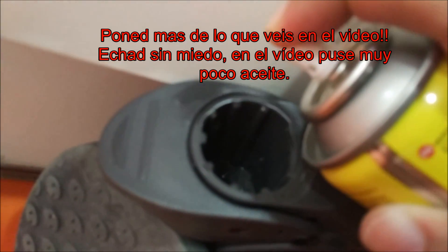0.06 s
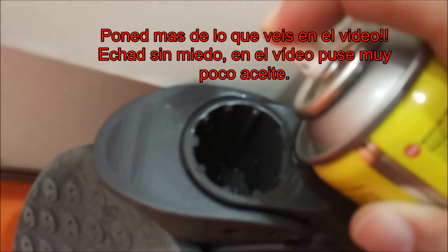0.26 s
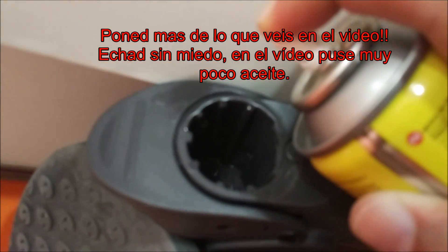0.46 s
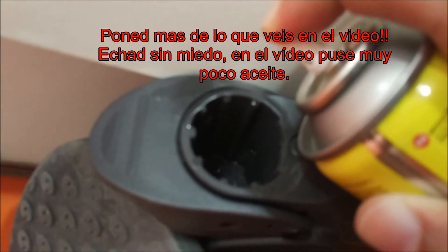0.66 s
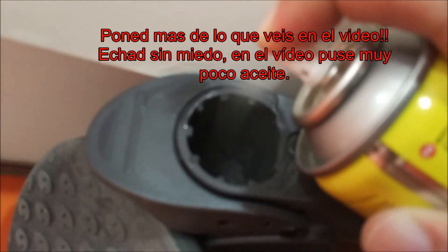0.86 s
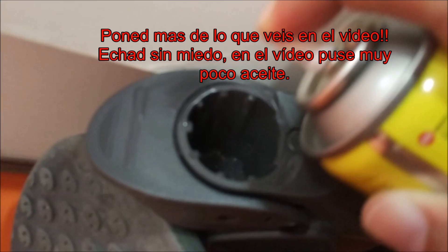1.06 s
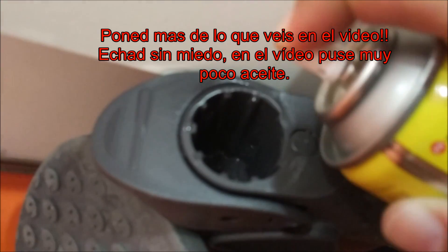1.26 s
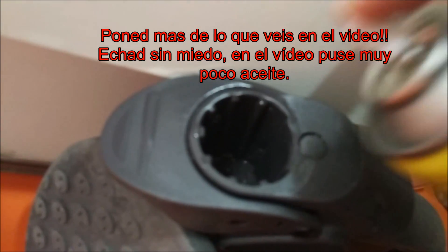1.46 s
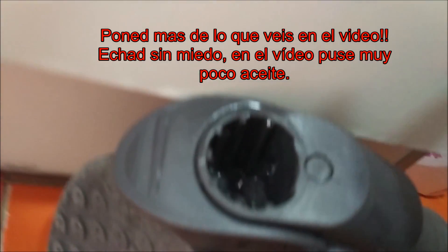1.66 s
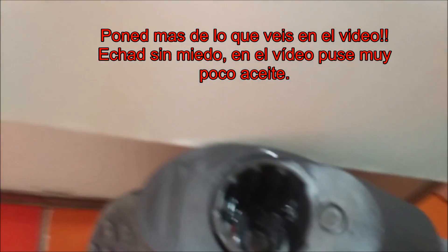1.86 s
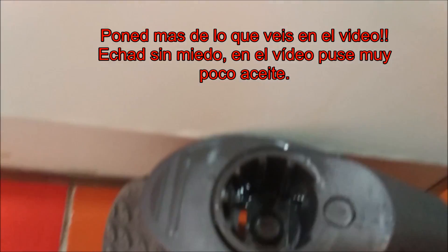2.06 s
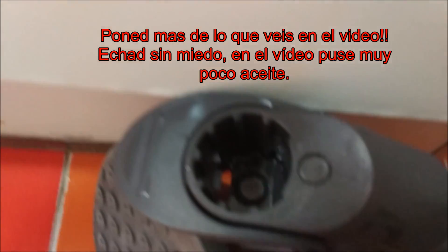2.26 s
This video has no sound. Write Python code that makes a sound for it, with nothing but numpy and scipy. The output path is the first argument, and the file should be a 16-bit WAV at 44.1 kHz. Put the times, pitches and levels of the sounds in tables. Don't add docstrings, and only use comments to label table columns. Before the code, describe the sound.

An aerosol can sprays close up: a short puff, a brief gap, then a long hiss that swells and weakens before stopping. Small can clicks and hard knocks on tile follow, in a small room, phone microphone.

```python
import sys
import numpy as np
from scipy import signal
from scipy.fft import rfft, irfft, next_fast_len
from scipy.io import wavfile
from scipy.ndimage import uniform_filter1d

SR = 44100
rng = np.random.default_rng(int(sys.argv[2]) if len(sys.argv) > 2 else 0)


def master(y):
    cut = np.clip(np.atleast_2d(y).T, -1, 1)
    pcm = np.round(cut * 32767)
    wavfile.write(sys.argv[1], SR, pcm.astype(np.int16))


def field_ratio(decibels):
    return 10 ** (np.asarray(decibels, dtype=float) / 20)


N = 101429
SIDES = np.array([[1], [-1]])

# frequency in Hz, level in dB per Hz.
HOME_COLOUR = [(59, -71), (100, -57), (277, -3.5), (358, -31.5), (535, -8.5), (634, -15.5), (1130, -10),
               (1550, -15.5), (16000, -29.5)]
# frequency in Hz, width in Hz, level in dB.
HOME_DRONES = [(201, 46, 3), (312, 69, -5), (530, 135, -9.5)]
# start in seconds, level in dB, left minus right in dB, tilt in dB per octave.
KNOCKS = [
    (0.015, -82, 12, 9),
    (1.887, -60.5, 0, 9.5),
    (1.958, -42, -4, 4),
    (1.9626, -66.5, -26, 4),
    (1.9705, -53.5, -5, 9),
    (2.1404, -58, -8, 9.5),
    (2.144, -60, -5, 4),
    (2.151, -56.5, -10, 6),
    (2.1969, -47, -4, 1),
]
# frequency in Hz, level in dB, T60 in seconds.
HOUSING_MODES = [(546, 8.5, 0.058), (830, -16, 0.028), (944, 18, 0.024), (1218, 9.5, 0.04),
                 (1355, 10.5, 0.027), (1450, 6.5, 0.04), (1640, 0, 0.051), (2350, 4, 0.017),
                 (2730, -5, 0.082), (3360, -20, 0.014)]
# start in seconds, level in dB, scrape length in seconds,
# left minus right in dB, tilt in dB per octave.
TICKS = [
    (0.064, -91, 0.0022, 2, -6),
    (0.14, -79, 0.0028, -12, 32),
    (1.5488, -50, 0.004, 8, 4),
    (1.5542, -48, 0.005, 8, -6),
    (1.598, -65, 0.015, 14, 5),
    (1.887, -72, 0.0014, -2, -29),
    (2.0037, -57.5, 0.0099, 13.5, 11.5),
    (2.283, -67.5, 0.016, 17, 10.5),
    (1.678, -76, 0.043, 25, 21),
    (2.073, -73, 0.0049, 6, 10),
]
# frequency in Hz, level in dB, T60 in seconds.
CAN_MODES = [(3300, -14, .008), (4110, -11, .012), (4990, -8, .018), (6008, 0, .014), (7150, -1, .018),
             (8490, -8, .012), (9930, -13, .01), (13120, -20, .008)]
# time in seconds, gas flow in dB, share blown into the hollow in dB.
VALVE_PRESSES = [
    [(.165, -83, -32), (.187, -60, -17), (.19, -50, -11), (.204, -49.5, -22), (.21, -41, -3),
     (.24, -40, 2.5), (.3, -38, 3), (.345, -42.5, -20), (.38, -62, -2)],
    [(.499, -46.5, -30), (.53, -46, 2), (.55, -40, 1), (.69, -34.5, -10), (.86, -34, -2.5), (.99, -29.5, 2),
     (1.04, -31.5, 0), (1.18, -33, -3), (1.24, -38, -12)],
    [(1.24, -39.5, -16.5), (1.33, -39.5, -4.5), (1.38, -45, -15.5), (1.388, -52, -18), (1.41, -90, 6)],
    [(.38, -82, -12), (.42, -65.5, 3), (.499, -64, 16)],
]
# frequency in Hz, level in dB per Hz.
JET_LEFT = [(150, -25), (600, -15.5), (1500, -8.5), (3000, -10), (5300, 1), (8400, 1), (11500, -5.5),
            (15500, 1.5)]
# frequency in Hz, level in dB per Hz.
JET_RIGHT = [(150, -32), (600, -12), (2100, -2), (3400, -2.5), (6000, -10), (9500, -5), (12300, 3),
             (15600, 4)]
# frequency in Hz, width in Hz, depth in dB.
SHADOWS_LEFT = [(3600, 450, -9), (4600, 250, -6), (9100, 350, -6), (11400, 600, -8), (12600, 350, -6)]
# frequency in Hz, width in Hz, depth in dB.
SHADOWS_RIGHT = [(3400, 400, -5), (6200, 350, -7), (8000, 400, -5), (11100, 350, -7), (13900, 600, -5)]
# frequency in Hz, width in Hz, level in dB, left minus right in dB.
HOLLOW_MODES = [(1626, 270, -16.5, -21), (1870, 360, -11.5, -17), (1105, 610, -13, -6),
                (6590, 280, -19, 15.5), (15800, 150, -15, -30)]
# frequency in Hz,
# width in Hz, start and end in seconds, cancelled share.
OPPOSED_BANDS = [(4270, 400, .218, .36, 1), (4250, 120, .36, .49, 1), (4260, 420, .49, .78, 1),
                 (4010, 230, .82, .945, 1), (3330, 90, .55, .69, 1), (3750, 130, 1.005, 1.045, 1),
                 (3560, 200, 1.03, 1.085, 1), (3560, 80, 1.14, 1.22, 1), (4020, 160, 1.165, 1.2, 1),
                 (3930, 120, 1.23, 1.3, 1), (3530, 70, 1.28, 1.36, 1), (10650, 300, 1.045, 1.085, 1),
                 (10750, 220, 1.095, 1.2, 1), (9100, 110, 1.06, 1.2, 1), (3750, 150, 1.42, 1.547, 1),
                 (4500, 130, 1.7, 1.87, 1), (7550, 110, 1.85, 1.94, 1), (8000, 110, 2.16, 2.26, 1)]
# frequency in Hz, width in Hz, start and end in seconds, removed # share.
LEFT_GAP_BANDS = [(11500, 150, .56, .62, 1), (11400, 330, .61, .67, 1), (11450, 350, .74, .81, 1),
                  (11450, 300, .87, .93, 1), (11250, 300, .92, .98, 1), (11600, 200, 1., 1.09, 1),
                  (12450, 120, .72, .95, 1), (13050, 130, .88, 1.05, 1), (9000, 110, .95, 1.06, 1),
                  (3600, 130, .52, .93, 1), (3400, 120, .98, 1.12, 1), (3400, 120, 1.3, 1.4, 1),
                  (12500, 220, 1.23, 1.3, 1), (11600, 200, 1.21, 1.28, 1), (11600, 150, 1.31, 1.38, 1),
                  (6150, 100, .5, .65, 1), (14500, 150, .54, .62, 1), (11400, 330, .24, .3, 1),
                  (12500, 170, .24, .33, 1), (3450, 120, .23, .45, 1)]
# centre in seconds, level in dB, length in seconds, frequency in Hz, width in Hz.
HOOTS = [
    (0.774, -50, 0.075, 1094, 304),
    (0.925, -38, 0.024, 1585, 83),
    (0.999, -34.5, 0.028, 1581, 90),
    (1.089, -38, 0.026, 1556, 101),
    (1.165, -40, 0.026, 1578, 90),
]
# start in seconds, level in dB, centre in Hz, fade in seconds,
# left minus right in dB.
SCUFFS = [
    (1.5538, -52, 2600, .003, 4),
    (1.958, -54, 4000, .0012, 0),
    (1.958, -59, 10000, .001, 0),
    (1.9635, -60, 4000, .001, 0),
    (1.975, -62, 1900, .03, -4),
    (2.1396, -54, 4800, .003, -2),
    (2.143, -62, 3500, .03, 0),
    (2.153, -58, 4500, .003, 4),
    (1.562, -66, 7000, .04, 8),
]


def table(rows, hz):
    rows = np.array(rows)
    return np.interp(np.log(hz + 1), np.log(rows[:, 0]), rows[:, 1])


def shape(x, gain):
    size = next_fast_len(N + 4096)
    return irfft(rfft(x, size) * gain(np.fft.rfftfreq(size, 1 / SR)), size)[..., :N]


def unit(x):
    return x / np.sqrt(np.mean(x ** 2))


def peak(hz, centre_hz, width_hz):
    return 1 / (1 + 1j * (hz ** 2 - centre_hz ** 2) / (np.maximum(hz, 1) * width_hz))


def walk(rate):
    hold = int(SR / rate)
    steps = np.repeat(rng.standard_normal(N + 1)[:N // hold + 1], hold)
    return unit(uniform_filter1d(uniform_filter1d(steps, hold), hold)[:N])


def pan(x, db):
    return x * field_ratio(SIDES * db / 2)


def home():
    alike_hz, level_db, flicker_db = 770, -60.5, -0.5

    def colour(hz):
        drones = sum(field_ratio(db) * abs(peak(hz, f, w)) for f, w, db in HOME_DRONES)
        return field_ratio(table(HOME_COLOUR, hz)) + drones

    def lean(hz):
        balance_hz, balance_db = [900, 2000, 3500, 7000, 12500], [0, -5.0, -0.7, 3.0, 0.0]
        return field_ratio(SIDES * np.interp(np.log(hz + 1), np.log(balance_hz), balance_db))

    rumble = 0
    for centre_hz in 120 * 2. ** np.arange(8):
        def band(hz):
            octaves = np.log2((hz + 1) / centre_hz)
            return colour(hz) * np.cos(np.pi / 2 * np.clip(octaves, -1, 1))
        mid, side = shape(rng.standard_normal((2, N)), band)
        share = centre_hz / (centre_hz + alike_hz)
        both = (mid + share * side * SIDES) / np.hypot(1, share)
        rumble = rumble + field_ratio(flicker_db * walk(8.77)) * both
    return field_ratio(level_db) * unit(shape(rumble, lean))


def strike(at_s, db, scrape_s, pan_db, tilt_db, modes, pivot_hz, rough):
    crack_s, swell_s = .0012, .0006
    crack_db = 0 if rough else -5
    age = np.arange(4096) / SR
    ring = 0
    for f, m, t60 in modes:
        level_chance, pitch_chance, phase_chance = rng.standard_normal(3)
        level = field_ratio(m + tilt_db * np.log2(f / pivot_hz) + 1.0 * level_chance)
        phase = 2 * np.pi * f * (1 + pitch_chance / 100) * age + phase_chance / 4 * SIDES
        ring = ring + level * np.sin(phase) * 1000. ** (-age / t60)

    hz = np.fft.rfftfreq(4096, 1 / SR)
    crack = rng.standard_normal((2, 4096)) * np.exp(-age / crack_s)
    crack = irfft(rfft(crack) * peak(hz, pivot_hz * 2 ** (tilt_db / 5), 1.8 * pivot_hz) ** 2)
    crack = crack * np.sqrt(np.sum(ring ** 2) / np.sum(crack ** 2))

    grain = rng.standard_normal((1, 1024)) if rough else np.ones((1, 1024))
    push = grain * np.exp(-(age[:1024] / scrape_s) ** 2)
    hit = signal.fftconvolve(push, ring + field_ratio(crack_db) * crack, axes=1)
    if not rough:
        hit = hit * (1 - np.exp(-(np.arange(hit.shape[1]) / SR / swell_s) ** 2))
    out, start = np.zeros((2, N + hit.shape[1])), int(at_s * SR)
    out[:, start:start + hit.shape[1]] = hit * field_ratio(db) * 4 / abs(hit).max()
    return pan(out[:, :N], pan_db)


def knocks():
    contact_s, top_hz = 0.00005, 3400
    hits = sum(strike(s, db, contact_s, lr, tilt, HOUSING_MODES, 870, False) for s, db, lr, tilt in KNOCKS)
    return shape(hits, lambda hz: hz ** 4 / (hz ** 4 + 600 ** 4) / (1 + (hz / top_hz) ** 4))


def ticks():
    hits = sum(strike(s, db, length, lr, tilt, CAN_MODES, 3540, True) for s, db, length, lr, tilt in TICKS)
    return shape(hits, lambda hz: hz ** 2 / (hz ** 2 + 1800 ** 2))


def scatter(x):
    fade_s, level_db, from_hz, moving_share = 0.002, 8, 1100, 1.9
    left_lag_s, hand_moves_s = 0.000098, .2
    t, age = np.arange(N) / SR, np.arange(512) / SR
    size = next_fast_len(N + 4096)
    hz = np.fft.rfftfreq(size, 1 / SR)

    def cloud():
        echoes = rng.standard_normal((2, 512))
        sparse = rng.random((2, 512)) < .25
        return echoes * sparse * np.exp(-age / fade_s)

    still, source, out = cloud(), rfft(x, size), 0
    direct = np.exp(-2j * np.pi * hz * left_lag_s * np.array([[1], [0]]))
    for k in range(9):
        echoes = still + moving_share * cloud()
        late = rfft(echoes / np.sqrt(np.sum(echoes ** 2, axis=1, keepdims=True)), size)
        both = direct + field_ratio(level_db) * hz / (hz + from_hz) * late
        both = both / np.sqrt(uniform_filter1d(abs(both) ** 2, size=1600, axis=1))
        crossfade = np.cos(np.pi / 2 * np.clip(t / hand_moves_s - k, -1, 1))
        out = out + crossfade * irfft(source * both, size)[:, :N]
    return out


def valve():
    t = np.arange(N) / SR
    flow = aim = 0
    for press in map(np.array, VALVE_PRESSES):
        on = (t >= press[0, 0]) & (t < press[-1, 0])
        flow = flow + on * field_ratio(np.interp(t, press[:, 0], press[:, 1]))
        aim = aim + on * field_ratio(np.interp(t, press[:, 0], press[:, 2]))
    return flow, aim


def free_jet(gas, flow):
    apart_db = -5
    thin_from_s, thin_over_s, thin_db, thin_below_hz = 1.042, 0.068, -2.5, 4300

    def port(hz, jet, shadows):
        return field_ratio(table(jet, hz) + sum(db * np.exp(-((hz - f) / w) ** 2) for f, w, db in shadows))

    def ports(hz):
        return np.array([port(hz, JET_LEFT, SHADOWS_LEFT), port(hz, JET_RIGHT, SHADOWS_RIGHT)])

    own = field_ratio(apart_db) * flow * shape(rng.standard_normal((2, N)), lambda hz: hz / (hz + 700))
    jet = shape(scatter(gas + own), ports)
    body = shape(jet, lambda hz: 1 / (1 + (hz / thin_below_hz) ** 8))
    backed_off = np.clip((np.arange(N) / SR - thin_from_s) / thin_over_s, 0, 1)
    return jet + body * (field_ratio(thin_db * backed_off) - 1)


def hollow(flow, aim):
    blown = flow * aim * field_ratio(3.7 * walk(25.5)) * rng.standard_normal(N)

    def ring(hz):
        turn = np.exp(-.45j * SIDES)
        return sum(pan(peak(hz, f, w) ** 2 * field_ratio(db) * turn, lr) for f, w, db, lr in HOLLOW_MODES)

    return shape(blown, ring)


def rim(gas):
    level_db, fade_db_per_s = 7, 9
    falling = gas * field_ratio(level_db - fade_db_per_s * np.arange(N) / SR)
    return pan(shape(falling, lambda hz: peak(hz, 2210, 1030) ** 2 * np.exp(-.5j * SIDES)), -10)


def spray():
    sputter_db, sputter_per_s, droplet_db, droplet_spread_db = 1.04, 44.83, -10.5, 1
    flow, aim = valve()
    drops = rng.standard_normal(N) * field_ratio(droplet_spread_db * rng.exponential(size=N))
    sputter = field_ratio(sputter_db * walk(sputter_per_s))
    noise = rng.standard_normal(N) + field_ratio(droplet_db) * unit(drops)
    gas = flow * sputter * noise
    return rim(gas) + field_ratio(7.0) * free_jet(gas, flow) + field_ratio(15.0) * hollow(flow, aim)


def room(x):
    level_db, t60_s, dull_hz, gap_s = -11, 0.38, 8800, 0.0031
    age = np.arange(SR // 2) / SR
    tail = rng.standard_normal((2, len(age))) * (age > gap_s)
    low = signal.sosfilt(signal.butter(1, dull_hz, fs=SR, output="sos"), tail)
    tail = low * 1000. ** (-age / t60_s) + (tail - low) * 1000. ** (-age / (0.35 * t60_s))
    return field_ratio(level_db) * signal.fftconvolve(x, tail / np.sqrt(np.sum(tail ** 2) / 2), axes=1)[:, :N]


def cancel(x, part, rows):
    t, edge_s, spread = np.arange(N) / SR, 0.0067, 1.35
    removed = 0
    for f, w, start, end, share in rows:
        window = np.clip(np.minimum(t - start, end - t) / edge_s, 0, 1)
        band = shape(part, lambda hz: np.exp(-((hz - f) / (spread * w)) ** 4))
        removed = removed + np.clip(share, 0, 1) * window * band
    return x - removed


def oppose(x):
    x = np.array([cancel(x[0], x[0], LEFT_GAP_BANDS), x[1]])
    return cancel(x, x.mean(axis=0), OPPOSED_BANDS)


def far_hum():
    centre_s, length_s, tone_hz, sag_hz_per_s = 0.428, 0.093, 668, 220
    t = np.arange(N) / SR
    age = t - centre_s
    level = field_ratio(-62 + 3 * walk(28.9)) * np.exp(-(age / length_s) ** 4)
    cycles = tone_hz * t - sag_hz_per_s * age ** 2 / 2
    return level * np.sin(2 * np.pi * cycles + .8 * walk(40.7))


def hoots():
    t, breath = np.arange(N) / SR, rng.standard_normal(N)
    air = 0
    for s, db, length, f, w in HOOTS:
        tone = unit(shape(breath, lambda hz: peak(hz, f, w) ** 2))
        air = air + field_ratio(db) * np.exp(-((t - s) / length) ** 2) * tone
    return pan(np.array([air, np.roll(air, -8)]), -9.5)


def draught():
    centre_s, length_s, level_db = 0.817, 0.14, -55
    age = np.arange(N) / SR - centre_s
    air = unit(shape(rng.standard_normal(N), lambda hz: peak(hz, 374, 370) ** 2))
    return pan(field_ratio(level_db) * air * np.exp(-(age / length_s) ** 2), -3.1)


def scuffs():
    t, out = np.arange(N) / SR, 0
    for s, db, centre_hz, fade_s, lr in SCUFFS:
        grit = unit(shape(rng.standard_normal((3, N)), lambda hz: peak(hz, centre_hz, 1.1 * centre_hz) ** 2))
        burst = field_ratio(db) * (t >= s) * np.exp(-abs(t - s) / fade_s)
        out = out + pan((grit[0] + 0.63 * grit[1:]) * burst, lr)
    return out


def scene():
    jet = spray() + hoots()
    hits = ticks() + knocks() + scuffs()
    heard = jet + room(jet) + hits + field_ratio(-2) * room(hits) + home() + far_hum()
    return oppose(heard) + draught()


def roll_off(x):
    return signal.sosfilt(signal.butter(12, 16950, fs=SR, output="sos"), x)


def record(dry):
    bass_cut = signal.butter(6, 179.6, "high", fs=SR, output="sos")
    top_cut = signal.ellip(10, .3, 70, 15750, fs=SR, output="sos")
    mix = signal.sosfilt(bass_cut, dry) + field_ratio(-84) * rng.standard_normal(dry.shape)
    mix = signal.sosfilt(top_cut, mix)
    return roll_off(mix)


dry = scene()
out = record(dry)
master(out)
```